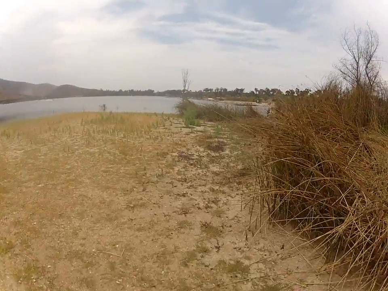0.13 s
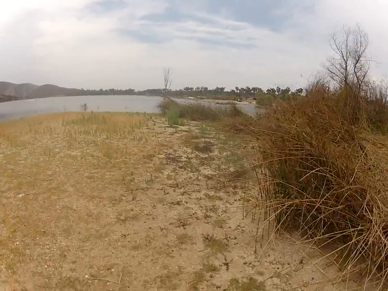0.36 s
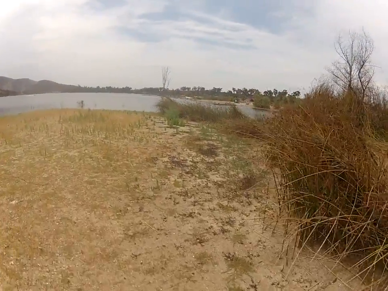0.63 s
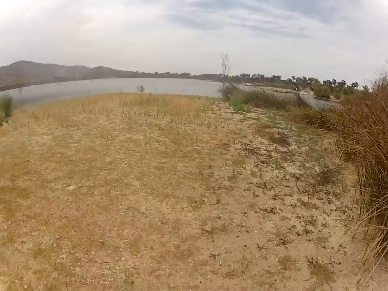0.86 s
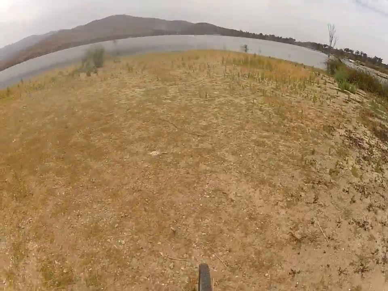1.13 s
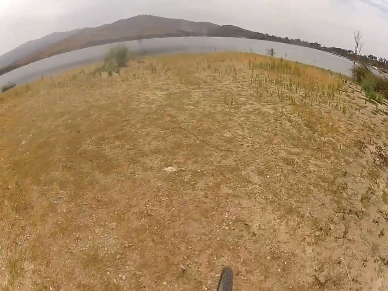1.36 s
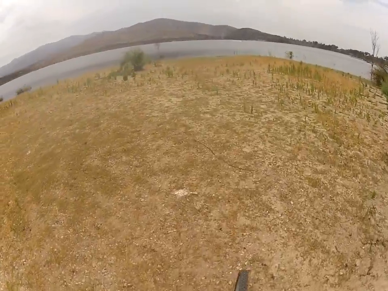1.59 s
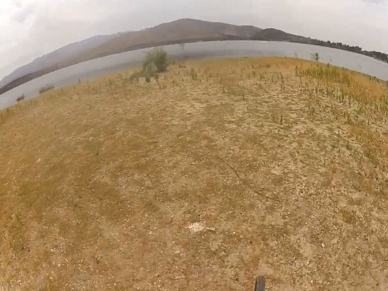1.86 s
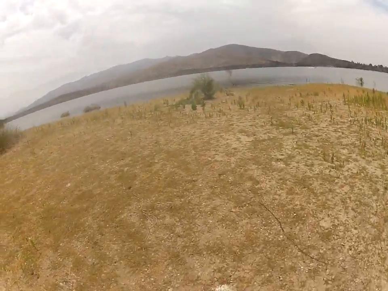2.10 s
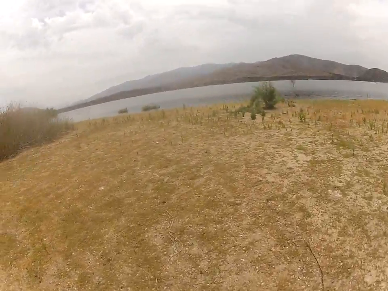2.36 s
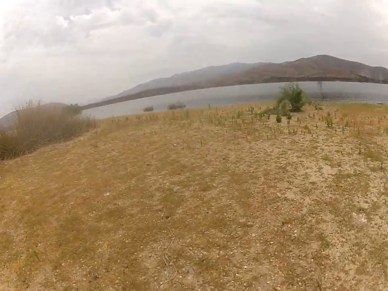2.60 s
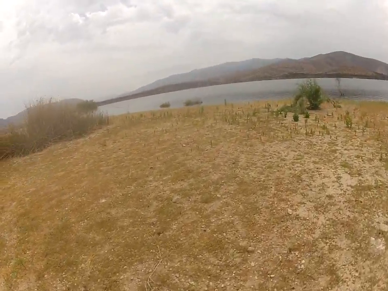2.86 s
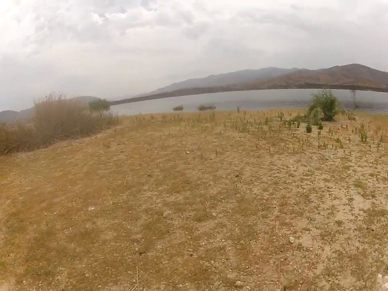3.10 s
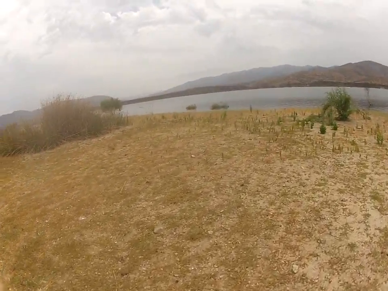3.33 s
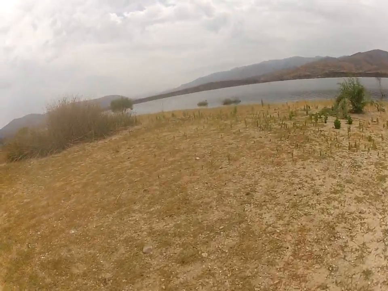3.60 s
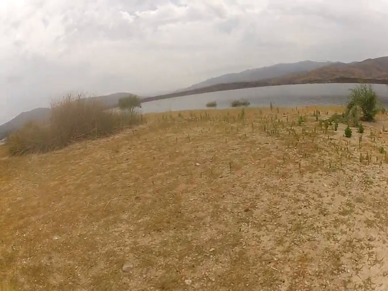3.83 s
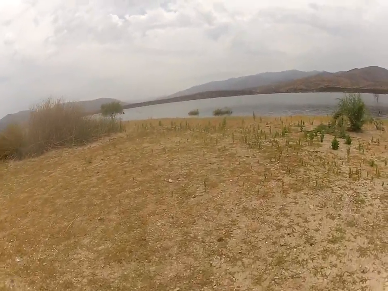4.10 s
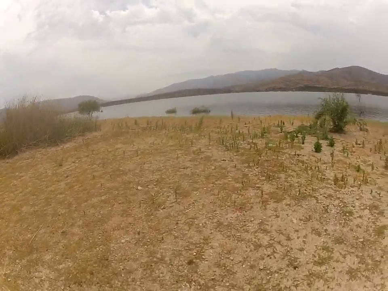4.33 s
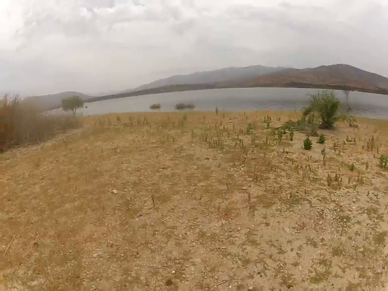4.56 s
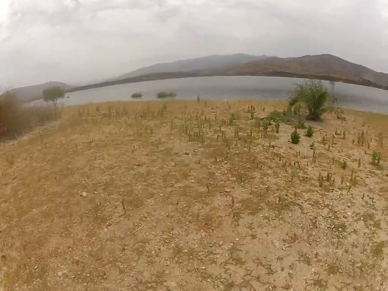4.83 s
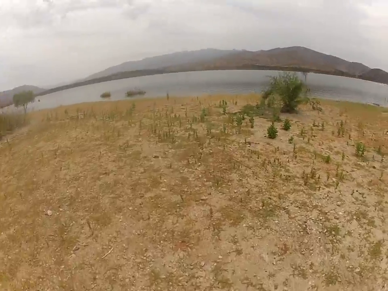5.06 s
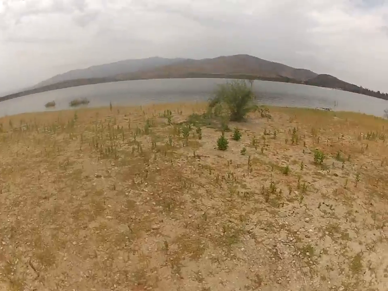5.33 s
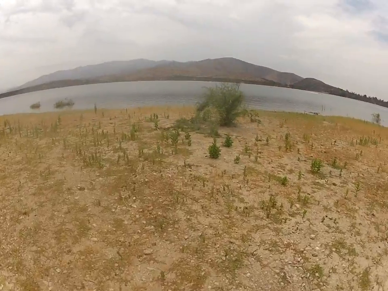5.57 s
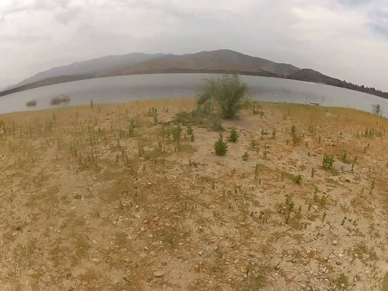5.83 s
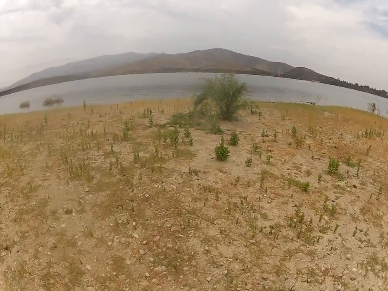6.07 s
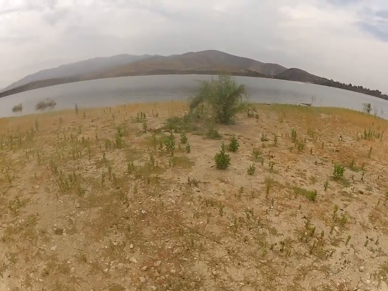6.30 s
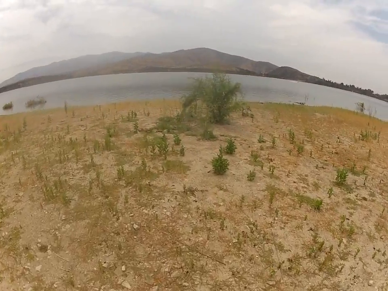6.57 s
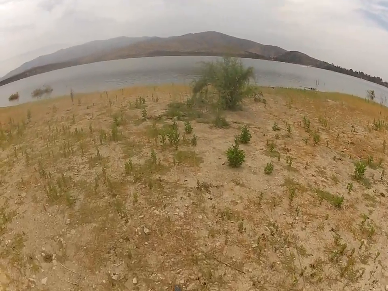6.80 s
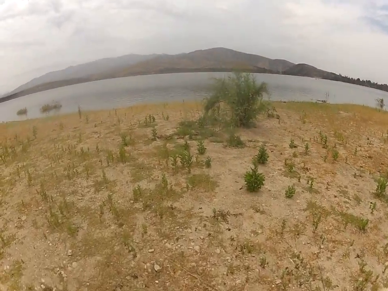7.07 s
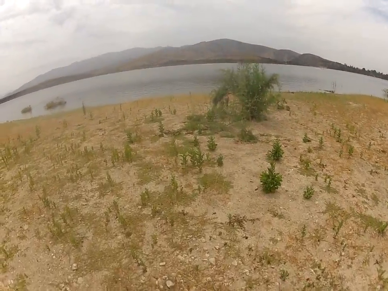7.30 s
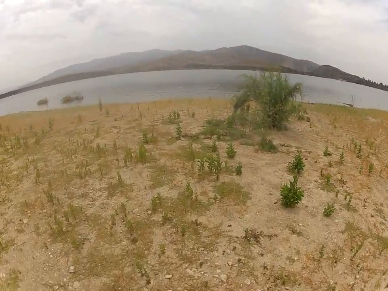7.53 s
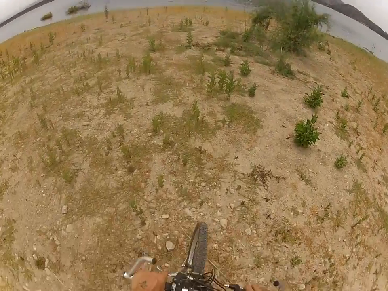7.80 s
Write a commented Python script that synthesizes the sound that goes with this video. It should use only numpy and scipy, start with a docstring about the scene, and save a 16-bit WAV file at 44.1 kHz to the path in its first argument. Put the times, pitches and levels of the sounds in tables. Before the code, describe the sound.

Low, wobbling rumble and dull tyre drone run under the dry crackle of grit as a bicycle rolls over rough ground. Plastic clicks come in irregular bursts, thickest in the middle with hard jolts, sparser afterwards, and again clustered near seven seconds. Occasional woody frame knocks and tiny rim pings. The microphone is enclosed in the rattling housing, very close and dry, with a coarse, metallic digital treble.

```python
"""Bumps shake the sprung mount of a small camera on the rider of a bicycle crossing rough dry dirt: low swings.
The camera sits in a plastic housing and rattles there: sharp contacts and loose chatter ring the housing.
Stones knock the frame and ping on the rim; random grains of grit ring housing and frame; coloured noise is
the tyre drone. The camera samples slowly and holds each value, which mirrors the spectrum into the treble."""
import sys
import numpy as np
from scipy import signal
from scipy.fft import rfft, irfft
from scipy.io import wavfile
from scipy.ndimage import uniform_filter1d

SR = 44100
rng = np.random.default_rng(int(sys.argv[2]) if len(sys.argv) > 2 else 0)


def linear_from_db(decibels):
    """Turn decibels (scalar or array-like) into linear amplitude factors; 0 gives 1."""
    return 10 ** (np.asarray(decibels, float) / 20)


def unload_wav(signal):
    """Save mono or channel-first audio to the path in sys.argv[1] as 16-bit WAV at rate SR, clipped to [-1, 1]."""
    wavfile.write(
        sys.argv[1],
        SR,
        np.round(np.clip(np.atleast_2d(signal).T, -1, 1) * 32767).astype(np.int16),
    )


N = 349272  # length in samples


# How strongly the mount heaves at each pitch: pitch_hz [Hz], density_db [dB per Hz, relative]
HEAVE_SPECTRUM = [(6, -1), (11, 0.5), (24, -4.5), (36, -4), (46, -6), (58, -15.5), (75, -24), (110, -28.5)]
# Hard bumps: time_s [s, 6 ms after the middle of the push], swing_db [dB, before a fixed trim],
# ring_s [s to fall 60 dB], contact_s [s]
HARD_BUMPS = [(1.914, -17.5, 0.06, 0.024), (2.02, -26.5, 0.15, 0.023), (2.113, -23, 0.14, 0.024),
              (2.237, -33, 0.19, 0.021), (2.424, -26, 0.067, 0.023), (2.686, -30, 0.11, 0.023),
              (2.782, -25, 0.053, 0.022), (3.076, -17, 0.23, 0.0019), (3.179, -14, 0.15, 0.0026),
              (3.265, -24, 0.1, 0.024), (3.397, -29.5, 0.11, 0.019), (3.563, -25, 0.2, .012),
              (3.652, -23, 0.12, 0.026), (3.735, -25, 0.32, 0.012), (3.788, -15, 0.13, 0.0029),
              (4.013, -20.5, 0.18, 0.0097), (4.092, -25.5, 0.063, 0.013), (4.603, -30, 0.065, 0.02),
              (4.972, -22.5, 0.13, 0.022), (5.5, -24, 0.14, 0.02), (5.599, -22.5, 0.13, 0.025),
              (5.676, -34, 0.091, 0.025), (5.83, -33.5, 0.12, 0.019), (7.069, -27, 0.15, 0.0047),
              (7.281, -23.5, 0.031, 0.012), (7.522, -20.5, 0.18, 0.034), (7.588, -30, 0.11, 0.015),
              (7.652, -26, 0.14, 0.024)]


def mount(shake_db):
    """Uneven ground heaves the sprung mount; hard bumps make it swing and ring out."""
    out = coloured(HEAVE_SPECTRUM) * linear_from_db(shake_db + 1.6 * walk(29))
    for time_s, swing_db, ring_s, contact_s in HARD_BUMPS:
        # a brief higher swing lies on top of the low spring note
        swing = np.pad(ring(swing_db - 12.0, 70., 0.023, 0.00084), (0, SR))
        add(swing, 0, ring(swing_db + 4.5, 36.8, ring_s, 0.0014, stiffen=0.051))
        # a longer contact rounds the swing off
        push = np.hanning(int(contact_s * SR) + 3)
        rounded = signal.fftconvolve(swing, push / push.sum())
        add(out, time_s - .006 - contact_s / 2, rounded)
    return out


def ring(level_db, pitch_hz, t60_s, rise_s, stiffen=0):
    """A swing that builds up and dies away; a stiffening spring hurries its start by stiffen turns."""
    t = np.arange(int(t60_s * SR) + 2) / SR
    turns = pitch_hz * t - stiffen * np.expm1(-t / 0.024)
    build_up = -np.expm1(-t / rise_s)
    decay = np.exp(-np.log(1000) * t / t60_s)
    return linear_from_db(level_db) * np.sin(2 * np.pi * turns) * decay * build_up


# Camera striking its housing: time_s [s], level_db [dB, before fixed trims and the ringing of the housing]
CAMERA_STRIKES = [(0.321, -40.5), (0.3244, -46.5), (0.636, -54), (0.673, -50), (0.7058, -43.5),
                  (0.9051, -36), (0.9111, -40), (0.9148, -41), (0.9206, -42.5), (0.9704, -42.5),
                  (1.2121, -54), (1.2307, -53), (1.2467, -54), (1.8907, -37), (1.916, -40), (1.9199, -35),
                  (2.001, -49), (2.018, -41), (2.0268, -40), (2.091, -33), (2.1056, -43), (2.118, -38.5),
                  (2.189, -36.5), (2.1984, -50), (2.241, -34.5), (2.3365, -38), (2.3467, -46),
                  (2.4298, -41), (2.4333, -45.5), (2.657, -36.5), (2.6636, -35), (2.6745, -46.5),
                  (2.7144, -44.5), (2.7684, -40.5), (2.78, -43), (3.0352, -31.5), (3.0415, -34.5),
                  (3.046, -32.5), (3.0487, -36), (3.0786, -36.5), (3.081, -38), (3.1415, -28),
                  (3.1494, -37), (3.1828, -39), (3.1874, -33), (3.194, -40.5), (3.2538, -38.5),
                  (3.273, -51), (3.4016, -44), (3.4086, -39.5), (3.5354, -34), (3.5415, -36), (3.543, -34),
                  (3.553, -62), (3.5661, -46), (3.5727, -44), (3.5758, -45), (3.6513, -46.5), (3.7588, -36),
                  (3.7637, -32), (3.771, -36.5), (3.7753, -37), (3.7902, -33.5), (3.7955, -35),
                  (3.857, -34), (3.8635, -34), (3.8735, -60), (3.906, -38.5), (3.9887, -32.5),
                  (3.9986, -34.5), (4.0109, -50), (4.017, -38.5), (4.0293, -49), (4.0991, -50),
                  (4.1104, -60), (4.1818, -55), (4.2013, -44), (4.4334, -38), (4.443, -40), (4.454, -49),
                  (4.4997, -37.5), (4.5097, -50), (4.5718, -34), (4.5803, -36), (4.5851, -41), (4.592, -43),
                  (4.6215, -38.5), (4.6316, -44), (4.9482, -32), (4.9607, -44), (4.974, -35),
                  (4.9851, -42.5), (5.403, -38), (5.481, -37), (5.4846, -40), (5.504, -34.5), (5.5118, -42),
                  (5.5763, -35), (5.605, -35), (5.7933, -35), (5.8013, -42.5), (5.834, -50), (5.857, -51),
                  (5.8645, -40.5), (6.008, -51), (6.468, -51.5), (6.5742, -38.5), (6.6021, -47),
                  (6.8203, -42), (7.0199, -34.5), (7.0237, -33), (7.0295, -32), (7.0347, -39),
                  (7.0751, -40), (7.2416, -36.5), (7.2515, -34.5), (7.2609, -45), (7.2975, -50),
                  (7.3094, -43), (7.3571, -58), (7.3648, -40), (7.5293, -43.5), (7.5678, -36),
                  (7.5734, -33), (7.5784, -35), (7.5906, -51), (7.6002, -53), (7.6705, -39.5)]


def strikes():
    """The camera may bounce up to twice after a strike, weaker each time; returns all hits in order."""
    bounce_chance, gap_s, loss_db, scatter_db = .6, .004, 6.5, 1.5
    when, strength = np.transpose(CAMERA_STRIKES)
    room = np.diff(when, append=np.inf)
    chance = rng.random((len(when), 2, 3))
    later = np.cumsum(gap_s * (0.55 + 0.88 * chance[..., 0]), axis=1)
    # the second bounce loses less than the first
    scatter = scatter_db * (2 * chance[..., 1] - 1)
    weaker = np.cumsum(loss_db * np.array([1, .6]) + scatter, axis=1)
    # no second bounce without a first, and none too near the next strike
    happens = np.cumprod(chance[..., 2] < bounce_chance, axis=1)
    kept = happens * (later < room[:, None] - .002) > 0
    when = np.append(when, (when[:, None] + later)[kept])
    strength = np.append(strength, (strength[:, None] - weaker)[kept])
    order = np.argsort(when)
    return when[order], strength[order]


# Resonances of the housing: pitch_hz [Hz], width_hz [Hz, of the narrower of two filters], level_db [dB],
# part [whole part counts: 0 body, 1 middle, 2 top], loose_db [dB, share of the loose chatter]
HOUSING_MODES = [(2343, 290, -4, 0, -25), (3683, 267, 3, 1, 5), (4056, 610, -1.5, 1, -17),
                 (4963, 506, 4, 2, -8.5), (5286, 800, -1.5, 2.2, 0.5)]


def rattle(chatter_db):
    """Each strike is a sharp contact in a short scrape; close strikes are joined by chatter. All ring the housing."""
    drive = np.zeros((3, N))
    t = np.arange(-int(.006 * SR), int(.025 * SR)) / SR
    when, strength = strikes()
    gaps = np.diff(when, append=np.inf)
    following = np.append(strength[1:], -60)
    for time_s, level_db, gap_s, next_db in zip(when, strength, gaps, following):
        noise = rng.standard_normal(len(t))
        # a hard strike rebounds cleanly, a weak one drags
        hard = np.clip((level_db + 47.5) / 22.0, 0, 1)
        scrape = noise * np.exp(-(t / (.0016 - 0.00095 * hard)) ** 2)
        scrape = scrape / np.sqrt(np.sum(scrape ** 2))
        contact = (0.69 + 0.43 * hard) * (t == 0)
        strike = contact + (.9 - 0.8 * hard) * scrape
        # sparse small rebounds fill the gap to a close next strike
        if gap_s < .011:
            fade_s = gap_s + 0.00018
            debris_db = -25.5 + 0.39 * min(next_db - level_db, 0)
        else:
            fade_s = .006
            debris_db = -24.0 - 4.6 * hard
        debris = np.exp(-(t / np.where(t < 0, .003, fade_s)) ** 4)
        rebounds = linear_from_db(debris_db) * noise * debris * (rng.random(len(t)) < .1)
        # where it lands decides how much body, middle and top it has
        lands_db = rng.standard_normal(3) * [2.2, 1.2, 1.8]
        for part, part_db in zip(drive, lands_db):
            add(part, time_s - .006, linear_from_db(level_db + 24.0 + part_db) * (strike + rebounds))
    loose = unit(grains(1500., 2.46)) * linear_from_db(chatter_db + 9.5 + 4.0 * walk(40))
    out = np.zeros(N)
    for k, (pitch_hz, width_hz, level_db, part, loose_db) in enumerate(HOUSING_MODES):
        force = drive[int(part)] + loose * linear_from_db(loose_db)
        rung = band(band(force, pitch_hz, width_hz), pitch_hz, 6.2 * width_hz)
        out += (-1) ** k * linear_from_db(level_db) * rung  # neighbours have opposite sign
    return out


# Stones knocking the frame: start_s [s], level_db [dB, before fixed trims], pitch_hz [Hz, lower of two notes]
FRAME_KNOCKS = [(2.075, -47, 690), (2.586, -49, 1020), (3.039, -37.5, 646), (3.185, -39, 1030),
                (3.228, -48, 830), (3.453, -47, 680), (3.531, -47, 720), (3.68, -52, 896),
                (4.345, -46, 750), (5.553, -48, 738), (7.003, -45, 1054), (7.219, -55, 950),
                (7.36, -47, 670), (7.529, -55, 610), (7.66, -39, 965.5)]
# Stones pinging on the rim: start_s [s], peak_db [dB], pitch_hz [Hz]
RIM_PINGS = [(1.1192, -53, 2510), (2.7815, -49.5, 2500), (3.5698, -50, 2210), (3.7, -48, 2700),
             (4.3345, -58, 2214), (4.6253, -45, 2500), (5.6306, -48, 2290), (5.9281, -52, 2480),
             (5.9505, -46, 2230), (6.166, -47, 2210), (6.6979, -54, 2400), (6.978, -47, 2332),
             (7.67, -41.5, 2400), (7.808, -48, 2340)]


def stones():
    """Compact two-note knocks on the frame; pings on the rim are a scuffed blow into one resonance."""
    out = np.zeros(N)
    for start_s, level_db, pitch_hz in FRAME_KNOCKS:
        add(out, start_s, ring(level_db + 5.5, pitch_hz, 0.016, 0.00094))
        add(out, start_s, ring(level_db - 7.0, 1.41 * pitch_hz, 0.035, 0.0011))
    t = np.arange(int(.05 * SR)) / SR
    for start_s, peak_db, pitch_hz in RIM_PINGS:
        scuff = rng.standard_normal(len(t)) * np.exp(-t / 0.0073)
        blow = band(band(scuff, pitch_hz, 474.0), pitch_hz, 914.0)
        add(out, start_s, linear_from_db(peak_db) * blow / np.abs(blow).max())
    return out


def grit(modes, level_db, favoured_hz, falloff_db):
    """Crushed grit excites a set of resonances, each flickering on its own."""
    crunch = unit(grains(3000., 1.65)) * linear_from_db(1.78 * walk(32))
    out = np.zeros(N)
    for k, (pitch_hz, width_hz, mode_db) in enumerate(modes):
        # resonances far from the favoured pitch are weaker
        shade_db = -falloff_db * np.abs(np.log2(pitch_hz / favoured_hz))
        flicker_db = 1.22 * walk(20)
        rung = band(band(crunch, pitch_hz, width_hz), pitch_hz, 2.43 * width_hz)
        out += (-1) ** k * linear_from_db(mode_db + shade_db + flicker_db) * rung
    return unit(out) * linear_from_db(level_db)


# Coarse patches of ground: middle_s [s], length_s [s], housing_rise_db [dB], frame_rise_db [dB]; below 0 is a dip
COARSE_PATCHES = [(0.346, 0.11, 4, 0), (0.697, 0.05, 9.5, 6), (0.802, .1, 4.5, 0), (0.933, 0.085, 5, 7),
                  (1.25, .1, 3.5, 4), (1.448, 0.11, 4.5, 1.5), (1.612, 0.093, 6.5, 6.5),
                  (1.832, 0.074, 5.5, 7.5), (2.084, 0.33, 0, 5.5), (2.438, 0.041, 8, 0),
                  (2.617, 0.057, 4, -1), (3.05, 0.09, 5, 8), (3.152, .1, 2, 9.5), (3.45, 0.033, 6, 3.5),
                  (3.587, 0.059, 3, 5), (3.693, 0.041, 4, 5), (3.8, 0.071, 5, 8.5), (4.018, 0.046, 3, 6),
                  (4.343, 0.051, -4, 4.5), (4.509, 0.098, 2.5, -3), (4.63, 0.03, -1, 3), (4.96, 0.11, 3, 5),
                  (5.435, 0.079, 1, 4), (5.8, 0.034, 6, 8), (5.865, 0.036, 4, 4), (5.965, 0.12, 3, 2),
                  (6.172, 0.051, 4, 3), (6.569, 0.086, 6, 2.5), (7.021, 0.058, 2, 11), (7.091, 0.038, 3, 5),
                  (7.25, 0.029, 5, 10), (7.354, 0.052, 2.5, 4), (7.567, 0.12, 5, 6.5),
                  (7.688, 0.069, 8.5, 4), (7.811, 0.04, 6.5, 3)]


def patches():
    """The change in crunch level swells and fades as the wheels cross each coarse patch."""
    out = np.zeros((2, N))
    for middle_s, length_s, *rises_db in COARSE_PATCHES:
        swell = np.sqrt(np.hanning(int(length_s * SR)))
        for part, rise_db in zip(out, rises_db):
            add(part, middle_s - length_s / 2, rise_db * swell)
    return out


# Drone of the tyre casing: pitch_hz [Hz], density_db [dB per Hz, relative]
CASING_SPECTRUM = [(60, -12), (100, -2.5), (160, 0), (230, -2), (330, -6), (480, -10), (800, -25.5),
                   (1400, -25.5), (3000, -25), (6000, -31)]


def casing(drone_db):
    """The drone of the rolling tyre: coloured noise whose level wanders."""
    return coloured(CASING_SPECTRUM) * linear_from_db(drone_db + 1.4 * walk(12))


def coloured(spectrum):
    """Noise shaped to a spectrum of (Hz, dB) points, silenced 60 dB down outside them, rms 1."""
    hz, db = np.transpose(spectrum)
    f = np.maximum(np.fft.rfftfreq(N, 1 / SR), 1)
    colour = linear_from_db(np.interp(np.log(f), np.log(hz), db, left=-60, right=-60))
    return unit(irfft(rfft(rng.standard_normal(N)) * colour, N))


def grains(per_s, spread_db):
    """Scattered impulses, many small and a few large."""
    hit = rng.random(N) < per_s / SR
    return hit * rng.standard_normal(N) * linear_from_db(spread_db * rng.exponential(size=N))


def walk(rate):
    """A random wandering curve: levels held 1 / rate seconds, then smoothed twice."""
    k = int(SR / rate)
    held = np.repeat(rng.standard_normal(N // k + 1), k)
    return 0.92 * uniform_filter1d(uniform_filter1d(held, k), k)[:N]


def band(x, pitch_hz, width_hz):
    """One resonance, gain 1 at its centre."""
    return signal.lfilter(*signal.iirpeak(pitch_hz, pitch_hz / width_hz, fs=SR), x)


def unit(x):
    """Scale to rms 1."""
    return x / np.sqrt(np.mean(x ** 2))


def add(out, start_s, wave):
    """Mix a short sound in at start_s."""
    start = int(start_s * SR)
    out[start:start + len(wave)] += wave[:len(out) - start]


# The ride, levels before wander and patches: time_s [s], grit_db [dB, grit in the housing],
# frame_db [dB, grit in the frame], chatter_db [dB, before a fixed trim], shake_db [dB, heave of the mount]
RIDE_LEVELS = [(0.0, -66.5, -71.5, -86, -52), (0.66, -56, -66, -76, -42.5), (0.81, -58, -65, -73, -53),
               (1.12, -62, -68, -78, -42.5), (1.79, -66, -68, -79.5, -40), (2.03, -58.5, -65, -76, -40),
               (2.51, -65, -64, -78, -41), (2.96, -65.5, -69, -80, -40), (3.2, -59, -66.5, -73, -40),
               (3.44, -61, -67.5, -78, -41.5), (3.73, -60, -66, -67, -49), (3.95, -66.5, -64.5, -86, -40.5),
               (4.26, -66, -72.5, -78, -47.5), (4.52, -63, -62.5, -87, -44), (4.74, -67, -69.5, -84, -42.5),
               (5.38, -68.5, -70, -88, -43), (5.67, -62, -66, -78, -45.5), (5.84, -62, -67.5, -80, -45),
               (6.31, -65.5, -70, -79.5, -44.5), (6.81, -66, -70, -85, -51), (6.99, -61.5, -68, -82, -46),
               (7.52, -61.5, -64.5, -78, -45.5), (7.72, -67.5, -67, -79, -42), (7.92, -61, -71, -85, -38.5)]
# Coarser or finer soil favours lower or higher resonances: time_s [s], favoured_hz [Hz],
# falloff_db [dB per octave away from it]
SOIL_COLOUR = [(0.0, 2330, 17), (0.3, 2160, 20), (0.8, 2190, 29), (0.97, 2070, 14), (1.28, 2600, 15.5),
               (1.65, 2350, 12), (1.85, 2050, 6), (2.3, 2190, 14), (2.8, 2310, 9), (3.2, 2110, 16),
               (3.6, 2290, 23.5), (3.95, 2100, 4), (4.6, 2240, 24), (4.85, 2000, 11), (5.3, 2210, 13),
               (5.95, 2150, 15), (6.4, 2050, 18), (7.0, 2148, 22), (7.3, 1895, 17), (7.92, 2250, 15)]
# What the grit rings in the housing: pitch_hz [Hz], width_hz [Hz, of the narrower of two filters], level_db [dB]
SHELL_MODES = [(1698, 366, 0.5), (2050, 153, -3.5), (2350, 430, -4.5), (2938, 185, -2.3)]
# What the grit rings in the frame: pitch_hz [Hz], width_hz [Hz, of the narrower of two filters], level_db [dB]
FRAME_MODES = [(658, 165, -1), (995, 246, 3.5)]


def scene():
    """Everything reaches the microphone through mount and housing: here the layers are summed."""
    t = np.arange(N) / SR
    time_s, *columns = np.transpose(RIDE_LEVELS)
    grit_db, frame_db, chatter_db, shake_db = (np.interp(t, time_s, c) for c in columns)
    time_s, *columns = np.transpose(SOIL_COLOUR)
    favoured_hz, falloff_db = (np.interp(t, time_s, c) for c in columns)
    shell_rise_db, frame_rise_db = patches()
    lumps = walk(18)  # shared by housing and frame
    shell = grit(SHELL_MODES, grit_db + shell_rise_db + 1.4 * lumps, favoured_hz, falloff_db)
    frame = grit(FRAME_MODES, frame_db + frame_rise_db + 1.5 * lumps, favoured_hz, 0)
    # the drone follows part of the frame's rise
    drone = casing(-58 + 0.37 * frame_rise_db)
    mix = mount(shake_db) + rattle(chatter_db) + stones() + shell + frame + drone
    return mix[None]


def band_limit(x):
    """A steep low-pass at the top of the band."""
    return signal.sosfilt(signal.butter(12, 16190, fs=SR, output="sos"), x)


def record(dry):
    """Sampled 12000 times a second and held, so every sound has mirror images around that rate; the top is cut."""
    smooth = signal.sosfilt(signal.butter(N=6, Wn=5500., fs=SR, output="sos"), dry)
    slow = signal.resample_poly(smooth, 40, 147, axis=1)  # 44100 to 12000 Hz
    stairs = np.repeat(slow, 4, axis=1)  # each value held for 4 samples at 48000 Hz
    held = signal.resample_poly(stairs, 147, 160, axis=1)  # 48000 to 44100 Hz
    aligned = np.pad(held, ((0, 0), (0, 16)))[:, 6:N + 6]  # 6 samples earlier
    top_cut = signal.ellip(8, .2, 40, 15100, fs=SR, output="sos")
    finished = signal.sosfiltfilt(top_cut, aligned)
    return band_limit(finished)


dry = scene()
out = record(dry)
unload_wav(out)
```